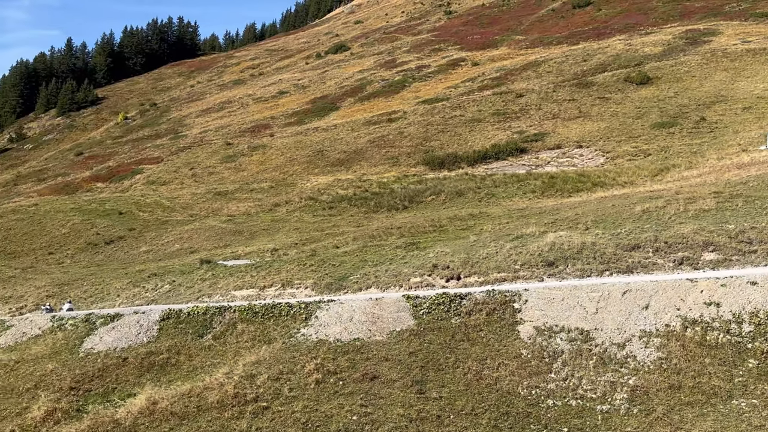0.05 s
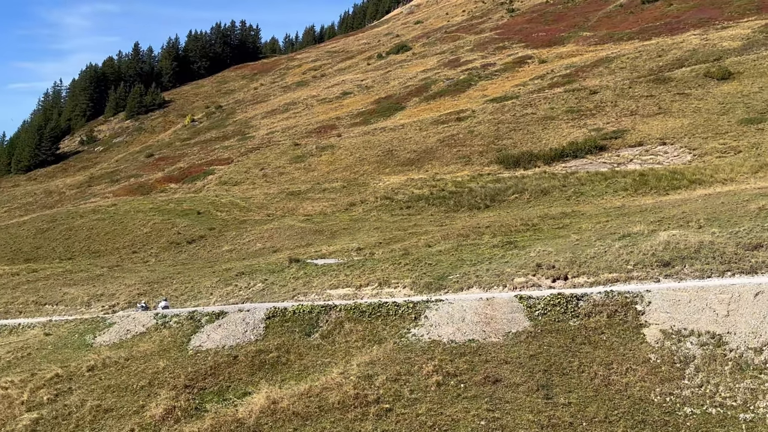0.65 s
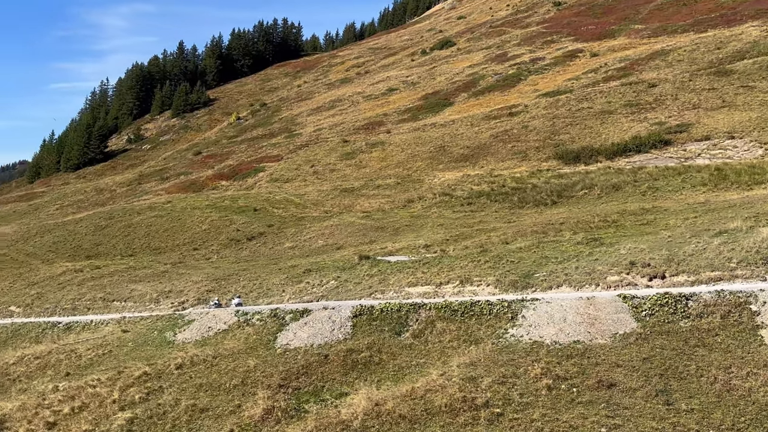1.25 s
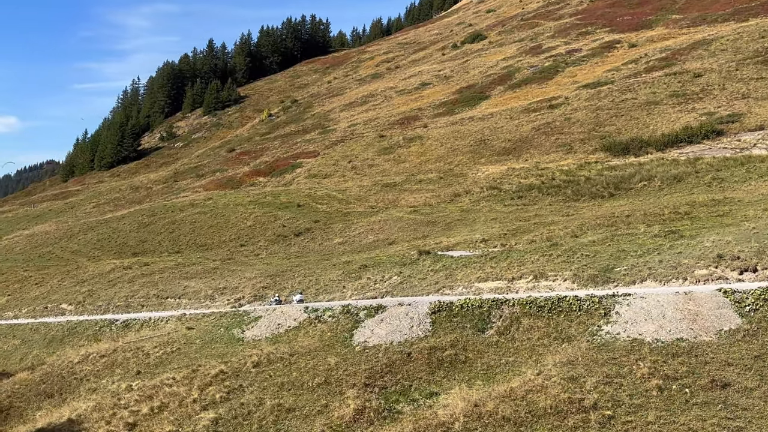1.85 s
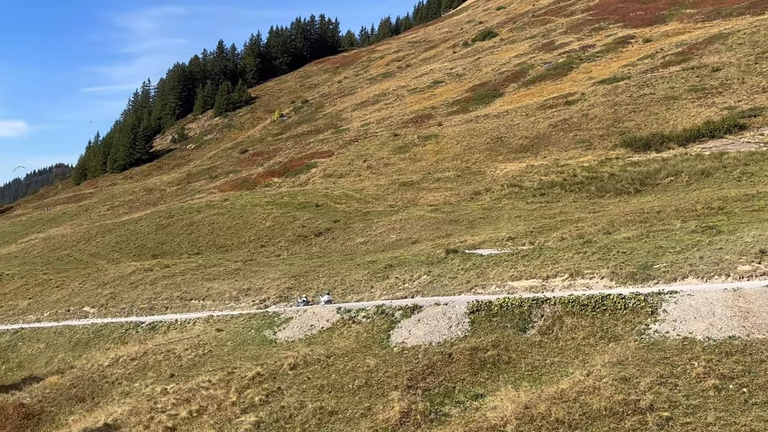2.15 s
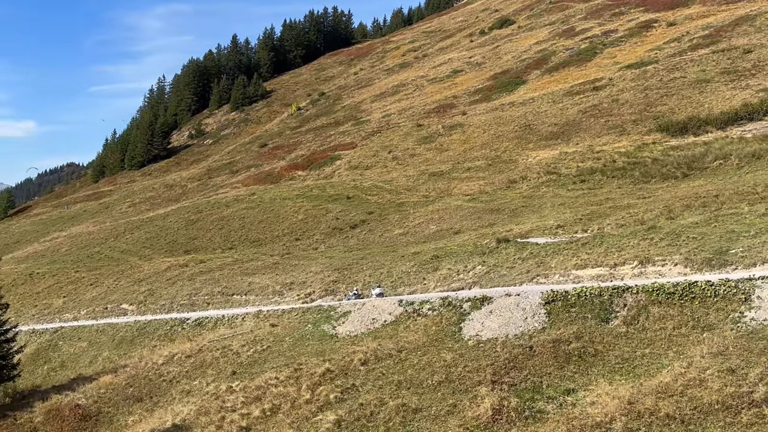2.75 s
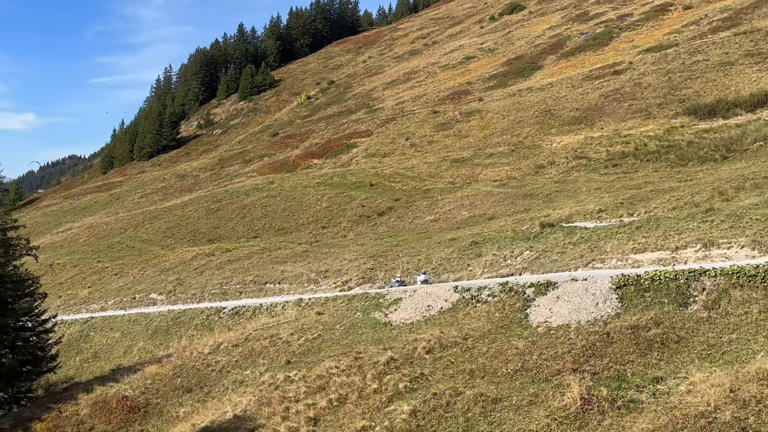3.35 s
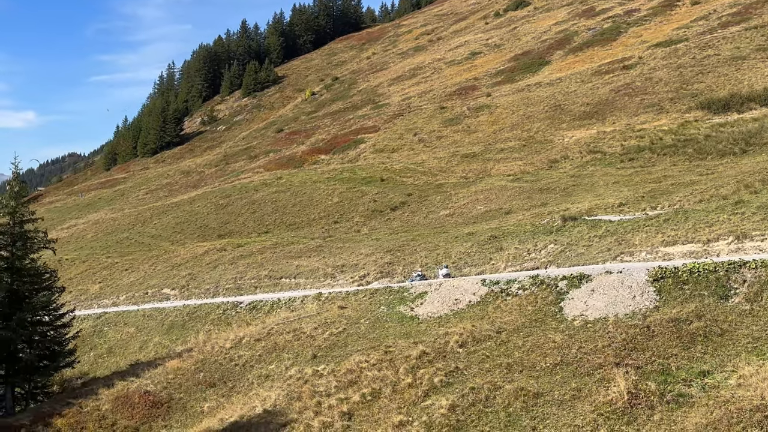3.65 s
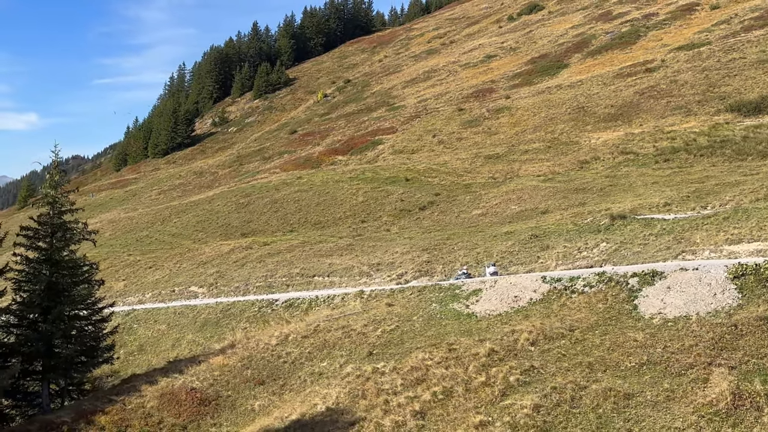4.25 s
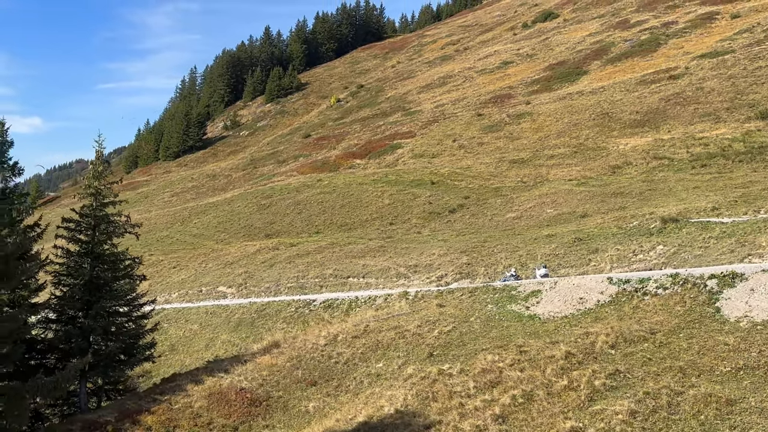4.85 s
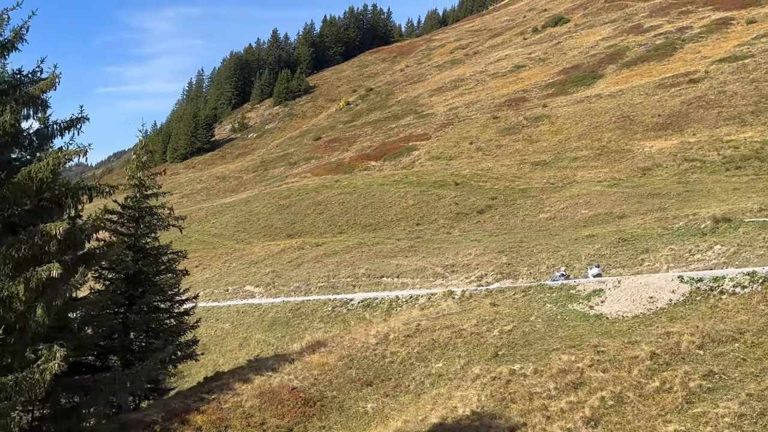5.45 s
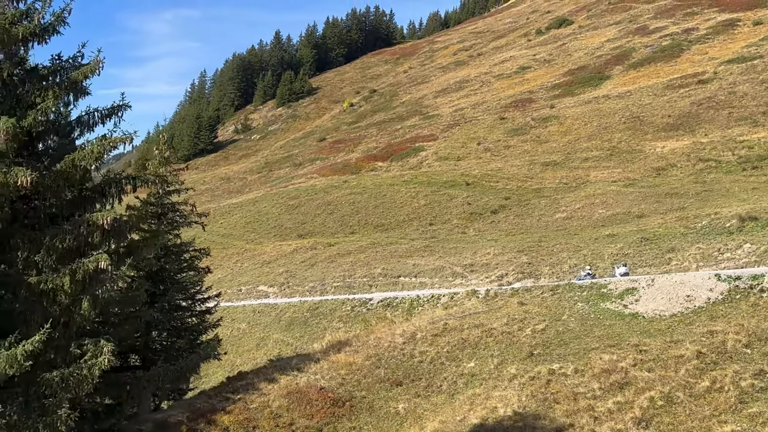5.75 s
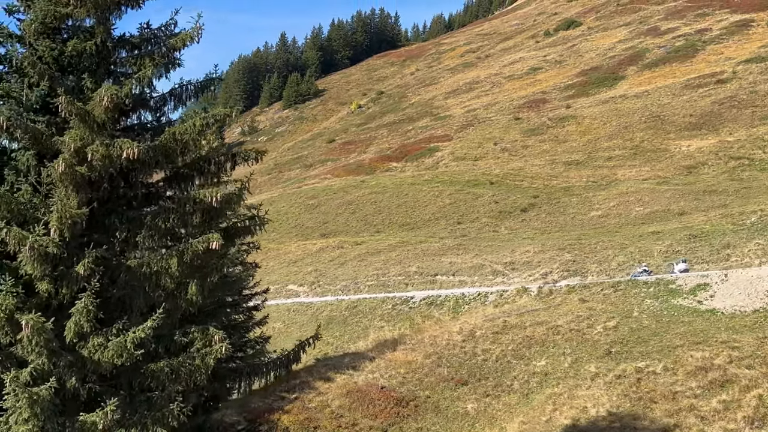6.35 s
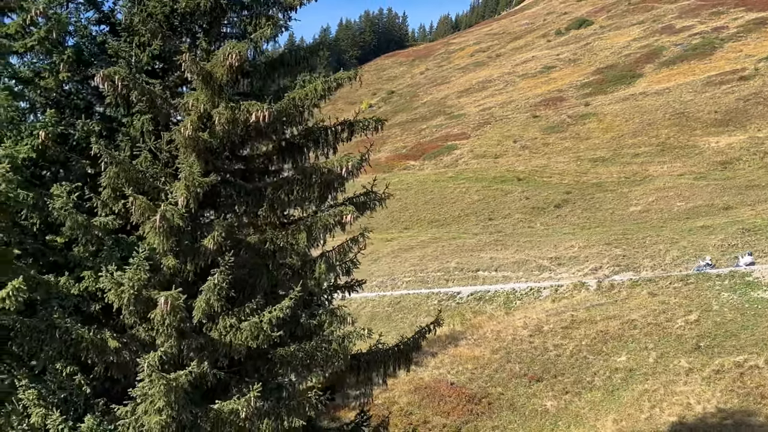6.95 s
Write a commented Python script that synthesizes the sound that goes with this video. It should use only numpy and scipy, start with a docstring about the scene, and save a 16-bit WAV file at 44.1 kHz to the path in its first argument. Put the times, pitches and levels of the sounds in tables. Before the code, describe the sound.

A gondola hums along its rope, booms and clatters quickly over tower rollers, then knocks and thuds as air rushes past, heard from inside.

```python
"""Inside a gondola passing a support tower. The haul rope hums through the hanger; the grip rolls over
a train of sheaves, each of which makes the cabin boom and its panels rattle. Then the swinging cabin
thuds and knocks, with small ticks from its fittings, while air rushes past the shell."""
import sys
import numpy as np
from scipy import signal
from scipy.fft import rfft, irfft, next_fast_len
from scipy.io import wavfile
from scipy.ndimage import uniform_filter1d, minimum_filter1d, map_coordinates

SR = 44100
rng = np.random.default_rng(int(sys.argv[2]) if len(sys.argv) > 2 else 0)


def to_wav(sig):
    """Store sig (one row per channel, or 1-D mono) as 16-bit WAV at the path in sys.argv[1].

    Samples outside -1..1 are clipped; the rate is SR.
    """
    pcm = np.clip(np.atleast_2d(sig), -1, 1) * 32767
    pcm = np.round(pcm).astype(np.int16)
    wavfile.write(sys.argv[1], SR, pcm.T)  # frames by channels


N = 317520
TIME_S = np.arange(N) / SR


# Rope hum, hanger overtone, low drone. Each row: time in seconds, relative level in dB.
HUM_LEVEL = [(0, -35), (.5, -51), (1.0, -33.5), (1.3, -34.5), (1.55, -26), (1.88, -24), (2.19, -28),
             (2.23, -44), (2.31, -49), (2.38, -28), (2.5, -27), (2.63, -32), (2.87, -28), (3.1, -39.5),
             (4.8, -31.5), (5.45, -41.5), (5.85, -32.5), (6.45, -37), (6.7, -46.5), (7.1, -35)]
OVERTONE_LEVEL = [(0, -64), (1.7, -53.5), (2.05, -52), (2.36, -58), (2.76, -51.5), (2.845, -32),
                  (2.875, -52), (3.6, -49.5), (3.9, -69.5)]
DRONE_LEVEL = [(0, -58.5), (1.9, -40), (2.15, -32.5), (2.55, -32), (4.0, -40), (4.75, -25), (5.3, -41.5),
               (7.2, -52)]

def rope_hum(hum_hz=182.2, overtone_hz=558, drone_hz=106.1):
    """The rope's twisted strands drum on the sheaves: a wavering hum with other tones around it."""
    pitch_hz = hum_hz * (1 + .008 * wobble(20))
    hum = amp(curve(HUM_LEVEL) - 2.15 + 1.6 * wobble(25)) * tone(pitch_hz)
    overtone = amp(curve(OVERTONE_LEVEL) + 2.3 * wobble(17)) * wavering(overtone_hz, .006, 23)
    fifth = amp(-48 + .56 * shake_db() + 4.5 * wobble(10)) * tone(pitch_hz * 3 / 2)
    drone = amp(curve(DRONE_LEVEL) + .5 + 2.2 * wobble(22)) * wavering(drone_hz, .0387, 20)
    return from_left(hum + overtone + fifth + drone, lead_ms=.45)


# Evenly spaced sheaves; the grip presses hardest mid-train.
SHEAVE_TIMES_S = 2.898 + (SHEAVE_GAP_S := .1233) * np.arange(7)
SHEAVE_PUSH_DB = -12 - 3.5 * np.linspace(-1, 1, len(SHEAVE_TIMES_S)) ** 2

def sheave_booms(sigma_s=.034, boom_hz=119, sway_hz=56):
    """Each sheave swells the cabin's two lowest resonances as the grip rides over it."""
    push = swells([(s, db, sigma_s) for s, db in zip(SHEAVE_TIMES_S, SHEAVE_PUSH_DB)])
    boom = amp(-1.63 + 2 * wobble(35)) * wavering(boom_hz, .0302, 30)
    sway = amp(-3.5 + 2.8 * wobble(30.1)) * wavering(sway_hz, .099, 25)
    walls = amp(-14.5) * noise(WALL_SPECTRUM)
    return grip_on() * push * (boom + sway + walls)


def grip_on(at_s=2.858, rise_s=.008):
    """Rises from 0 to 1 as the grip meets the first sheave."""
    return (1 + np.tanh((TIME_S - at_s) / rise_s)) / 2


# Cabin lurches. Each row: start in seconds, relative peak in dB, pitch in Hz, t60 in seconds.
THUDS = [(0.025, -21.5, 166, 0.18), (0.613, -23.5, 140, 0.05), (3.748, -12, 84.3, 0.17),
         (4.333, -13, 73.4, 0.18), (4.716, -5.5, 48.1, 0.39), (4.866, -10.5, 67.6, 1),
         (4.98, -3, 103, 0.071), (5.046, -4.5, 50.3, 0.12), (5.098, -13, 125.5, 0.072),
         (5.283, -13.5, 66.2, 0.12), (5.575, -12, 59.4, 0.19), (5.683, -16.5, 79.4, 0.062),
         (5.857, -16.5, 68.6, 0.078), (6.064, -19.5, 63, 0.054), (6.489, -19, 61, 0.34)]

def thuds(attack_s=.016):
    """A lurch on the hanger sets off a low, damped swing of the floor and one overtone."""
    out, t = np.zeros(N), np.arange(SR // 2) / SR
    for s, db, hz, t60_s in THUDS:
        phase = 2 * np.pi * hz * t
        swing = np.sin(phase) + .22 * np.sin(phase * rng.normal(1.9, .25))
        add(out, s, amp(db - 1.5) * crest(swing * burst(t, attack_s, t60_s)))
    return out


# Hanger knocks. Each row: start in seconds, body peak in dB, clack in dB re body,
# judder decay in seconds, clack pitch ratio.
KNOCKS = [(0.119, -24, -11.5, 0.023, 0.95), (.203, -37, 6.5, 0.0089, 0.88), (.25, -37.5, 3, 0.032, 0.87),
          (.306, -29.5, 3, 0.013, 0.79), (0.351, -26.5, -3, 0.016, 0.95), (.497, -33.5, -9.5, 0.0065, 0.86),
          (0.803, -43, -5, 0.0036, 1), (0.87, -34, -1, 0.014, 0.92), (.976, -28.5, -6, 0.0107, 0.87),
          (3.522, -20, -12.5, 0.021, 1.3), (3.757, -16, -18, 0.018, 1.04), (4.037, -24, -13, .007, 0.45),
          (4.333, -16.5, -11, 0.024, 0.67), (4.512, -22.5, -15.5, 0.014, 0.59),
          (4.766, -13, -14.5, 0.013, 1.15), (4.867, -17.5, -9.5, 0.0067, 1.02), (4.973, 0, -4.5, 0.012, 1),
          (5.1, -20.5, -14.5, 0.0058, 1.2), (5.279, -11, -4, 0.012, 1.023), (5.302, -20, 2, 0.007, 0.76),
          (5.576, -26, -0.5, 0.0058, 1.1), (5.595, -19.5, -5.5, 0.016, 0.87), (5.68, -15, -4, 0.017, 1.11),
          (6.049, -20, -2, 0.0067, 0.94), (6.29, -25, -10, 0.021, 1.1), (6.556, -22, -12, 0.0044, 1),
          (6.587, -19, -9.5, 0.009, 0.96), (6.621, -35.5, 12, 0.0026, 1.03)]
# Body and clack responses. Each row: frequency in Hz, gain in dB.
KNOCK_BODY = [(30, -25.5), (70, 2), (170, 4.5), (265, 5), (340, -3), (440, -6), (600, -24.5), (1000, -49),
              (2000, -72), (6000, -115)]
KNOCK_CLACK = [(150, -24.5), (245, 7), (335, -7.5), (450, 4.5), (540, -1.5), (660, -6.5), (750, 3.5),
               (795, -6.5), (845, -4.5), (890, -8.5), (945, -7), (1050, -12.5), (1170, -24), (1400, -28.5),
               (1850, -19.5), (2200, -32), (2700, -36.5), (5000, -67.5), (12000, -95)]

def knocks(body_lag_s=.00397):
    """The hanger judders in its joint: a round clack, then the dull body of the cabin."""
    bodies, clacks = np.zeros(N), np.zeros(N)
    for s, db, clack_db, decay_s, pitch_ratio in KNOCKS:
        clack = [(hz * pitch_ratio, gain_db) for hz, gain_db in KNOCK_CLACK]
        add(bodies, s + body_lag_s, amp(db) * crest(struck(judder(decay_s), KNOCK_BODY)))
        add(clacks, s, amp(db + clack_db) * crest(struck(judder(decay_s), clack)))
    return bodies + from_left(cabin(clacks, wet_db=-15.5), lead_ms=.21)


def judder(decay_s, gap_s=.003, count=16):
    """A quick, uneven run of contacts that dies away."""
    run = np.zeros(SR // 5)
    gaps_s = rng.uniform(.4, 1.6, count) * gap_s
    sizes = rng.uniform(.6, 1, count) * rng.choice([-1, 1], count)
    for s, size in zip(np.cumsum(gaps_s) - gaps_s[0], sizes):
        add(run, s, np.array([size * np.exp(-(s / decay_s) ** 2)]))
    return run


# Cabin shake. Each row: time in seconds, relative level in dB.
SHAKE_LEVEL = [(0, -32.5), (.25, -47), (1.25, -42.5), (1.7, -34.5), (2.1, -40), (2.52, -39.5),
               (2.85, -28.5), (3.5, -22.5), (3.9, -32.5), (4.6, -23.5), (5.1, -25), (5.38, -39.5),
               (5.95, -34), (6.8, -47), (7.2, -41.5)]
# Floor and wall noise. Each row: frequency in Hz, relative density in dB.
RUMBLE_SPECTRUM = [(12, -31.5), (25, 0), (36, 1.5), (55, 8), (85, 1), (115, -9), (160, -2.5), (300, -84.5),
                   (600, -120)]
WALL_SPECTRUM = [(50, -26), (90, 5), (120, 9), (155, 2), (205, 3.5), (235, -2.5), (280, -2.5), (370, -6),
                 (470, -12), (630, -16.5), (760, -40), (1200, -68), (3000, -120)]

def shell_rumble():
    """The running gear shakes the floor; the walls drone along and swell less."""
    floor = amp(curve(SHAKE_LEVEL) + 1.8) * noise(RUMBLE_SPECTRUM)
    walls = amp(-34 + .25 * shake_db() + 1.3 * wobble(23)) * noise(WALL_SPECTRUM)
    return floor + walls


def shake_db(usual_db=-36.5):
    """How much harder than usual the cabin is shaken."""
    return curve(SHAKE_LEVEL) - usual_db


# Panel clatters. Each row: start in seconds, peak in dB, t60 in seconds.
CLATTERS = [(2.858, -37.5, 0.089), (2.92, -38.5, 0.015), (2.977, -35.5, 0.079), (3.01, -34, 0.071),
            (3.034, -33.5, 0.017), (3.106, -34, 0.06), (3.143, -33.5, .03), (3.162, -35.5, 0.025),
            (3.233, -43, 0.044), (3.258, -34.5, 0.078), (3.326, -34, 0.055), (3.374, -30, 0.046),
            (3.396, -33.5, .04), (3.433, -35, 0.022), (3.484, -33, 0.046), (3.501, -33, .06),
            (3.58, -32, 0.035), (3.6147, -27, .055), (3.659, -40, 0.029), (3.684, -42.5, 0.029)]
# Clatter response. Each row: frequency in Hz, gain in dB.
CLATTER_RESPONSE = [(500, -2), (850, -4.5), (1200, 8.5), (1600, 2.5), (2000, 6.5), (2750, -5), (3300, -1),
                    (4000, -10.5), (4800, -7.5), (5500, -18), (6300, -9), (7500, -28.5), (9800, -30.5),
                    (15000, -32.5)]

def panel_clatters(attack_s=.0015):
    """Jolts from the sheaves throw the panels against their frames in rough bursts of contacts."""
    out, t = np.zeros(N), np.arange(SR // 8) / SR
    for s, db, t60_s in CLATTERS:
        hits = contacts(len(t), rate_hz=3500, spread_db=5.5) * burst(t, attack_s, t60_s)
        add(out, s, amp(db) * crest(struck(hits, CLATTER_RESPONSE)))
    return cabin(out, wet_db=-11.5) * pan(left_db=1.5)


# Panel response. Each row: frequency in Hz, gain in dB.
PANEL_RESPONSE = [(400, -13), (800, -1), (1150, 9.5), (1550, 7), (2050, 2.5), (2700, -7), (3300, -8.5),
                  (4100, -11), (4800, -13.5), (5400, -25), (6300, -16.5), (7500, -25), (9800, -22),
                  (11500, -35), (15800, -30)]
# Panel scrapes. Each row: centre in seconds, relative level in dB, sigma in seconds.
SCRAPES = [(.3, -58, 0.07), (.53, -62, 0.019), (4.98, -47, 0.016)]
RATTLE_TIMES_S, RATTLE_SIGMA_S = SHEAVE_TIMES_S - .041, .053  # just ahead of each boom

def panel_rattle(rate_hz=550, spread_db=5):
    """Loose panels chatter all around in tiny contacts, scrape, and surge at every sheave."""
    flutter = amp(1.8 * wobble(70))
    surges = [(s, db - 41, RATTLE_SIGMA_S) for s, db in zip(RATTLE_TIMES_S, SHEAVE_PUSH_DB)]
    idle = amp(-66 + .35 * shake_db())
    drive = idle + grip_on() * swells(surges) + swells(SCRAPES)
    left, ahead, right = [unit(struck(contacts(N, rate_hz, spread_db), PANEL_RESPONSE))
                          for _ in range(3)]
    return cabin(drive * flutter * (ahead + .5 * np.array([left, right])), wet_db=-4.5)


# Panel clicks. Each row: start in seconds, relative peak in dB.
CLICKS = [(0.143, -40), (0.528, -38.5), (.56, -37), (.592, -40), (.706, -45.5), (.885, -44.5), (.911, -45),
          (.946, -48), (0.992, -47), (1.052, -46.5), (1.082, -43), (1.164, -42), (1.177, -46.5),
          (1.198, -46.5), (1.356, -43.5), (1.385, -46.5), (1.454, -42.5), (1.575, -35.5), (1.607, -38),
          (1.657, -36.5), (1.7247, -39), (1.779, -39), (1.802, -38.5), (1.828, -40.5), (1.918, -37),
          (2.003, -39), (2.021, -37), (2.124, -41), (2.233, -46), (2.47, -37.5), (2.502, -41.5),
          (2.53, -42.5), (2.5623, -34.5), (2.669, -37), (2.684, -39), (2.746, -36), (5.507, -41),
          (5.672, -41), (5.842, -43), (5.904, -41), (6.018, -41), (6.157, -45.5), (6.221, -60),
          (6.345, -51), (6.403, -44), (6.518, -43), (6.55, -42), (6.852, -42), (7.07, -48)]

def panel_clicks(t60_s=.015):
    """A panel slips under load with a dry, woody click, each a little different in colour."""
    out, t = np.zeros(N), np.arange(SR // 20) / SR
    for s, db in CLICKS:
        response = [(hz, gain_db + rng.standard_normal()) for hz, gain_db in PANEL_RESPONSE]
        add(out, s, amp(db - 1) * crest(struck(snap(t, t60_s), response)))
    return cabin(dulled(out), wet_db=-10) * pan(left_db=1.5)


# Hanger groans. Each row: centre in seconds, level in dB, sigma in seconds, pitch in Hz.
GROANS = [(2.944, -29, 0.0016, 590), (3.005, -38, 0.014, 557), (3.045, -32, 0.0025, 478),
          (3.054, -36.5, 0.0076, 618), (3.188, -38, 0.0032, 425), (3.326, -43.5, 0.0045, 532),
          (3.375, -39, 0.0072, 640), (3.55, -33.5, .016, 420)]
# Hanger rub. Each row: frequency in Hz, relative density in dB.
RUB_SPECTRUM = [(200, -85.5), (400, -25.5), (520, 6.5), (565, -6), (650, 7.5), (800, -21.5), (1500, -120)]

def hanger_groans(rub_db=-49, rub_sigma_s=.065):
    """The hanger rubs softly at each sheave and gives short, pitched groans when jolted."""
    rubs = swells([(s, rub_db, rub_sigma_s) for s in SHEAVE_TIMES_S]) * noise(RUB_SPECTRUM)
    waver = 1 + .0515 * wobble(120)
    return rubs + sum(swells([(s, db, sigma_s)]) * tone(hz * waver) for s, db, sigma_s, hz in GROANS)


# Sheave hiss. Each row: frequency in Hz, relative density in dB.
HISS_SPECTRUM = [(1000, -1), (1300, 4), (2200, -3.5), (2800, 0), (3500, 1.5), (4100, -5.5), (4800, -4),
                 (5400, -7), (6200, -7), (7400, -16), (9700, -17), (11500, -24.5), (15500, -27.5)]
# Brief flares. Each row: centre in seconds, level in dB, sigma in seconds.
HISS_FLARES = [(3.398, -51.5, 0.01), (3.515, -48, 0.0069), (7.2, -64, 0.062)]

def sheave_hiss(rise_db_per_s=8.5, fall_db_per_s=151, dip=.28):
    """The sheave train hisses on the left: grows as it nears, pulses, and drops away once passed."""
    past_last_s = TIME_S - RATTLE_TIMES_S[-1]
    nearness_db = np.minimum(rise_db_per_s * past_last_s, -fall_db_per_s * past_last_s)
    between = swells([(s - SHEAVE_GAP_S / 2, 0, RATTLE_SIGMA_S / 2) for s in RATTLE_TIMES_S])
    passing = amp(-55 + nearness_db + 2 * grip_on()) * (1 - dip * between)
    running_rope = amp(-81.5 + .3 * shake_db())
    level = np.hypot(passing, running_rope) + swells(HISS_FLARES)
    flutter = amp(1.7 * wobble(50))
    return level * flutter * noise(HISS_SPECTRUM) * pan(left_db=5)


# Catch hits. Each row: start in seconds, clack peak in dB.
CATCH_HITS = [(0.256, -43.5), (0.307, -43), (0.3226, -41), (0.332, -35.5), (0.342, -44.5), (0.3822, -45)]
# Catch response. Each row: frequency in Hz, gain in dB.
CATCH_RESPONSE = [(1200, -5.5), (1950, 10), (2600, -6), (3200, 2.5), (3800, -16), (4650, -16), (5400, -18),
                  (6300, -14.5), (8000, -27), (15000, -35)]

def catch_jiggle(t60_s=.0068, ring_hz=3200, ring_t60_s=.017):
    """A small metal catch jiggles: each hit is a rough clack with a short ring of close modes."""
    out, t = np.zeros(N), np.arange(SR // 10) / SR
    for s, db in CATCH_HITS:
        clack = crest(struck(snap(t, t60_s), CATCH_RESPONSE))
        ring = amp(-15 - 60 * t / ring_t60_s) * modes(t, ring_hz * rng.normal(1, .04, size=3))
        add(out, s, amp(db) * (clack + ring))
    return cabin(out, wet_db=-1.5)


# Fitting ticks. Each row: start in seconds, relative peak in dB.
TICKS = [(2.669, -53), (3.011, -48), (3.375, -42.5), (4.669, -51), (4.682, -47), (4.96, -51.5),
         (5.216, -57), (5.27, -49), (5.907, -53), (6.018, -53), (6.148, -47.5), (6.154, -47), (6.25, -50),
         (6.284, -53), (6.401, -54.5), (6.52, -57)]

def fitting_ticks(centre_hz=9030, width=.11, attack_s=.002, t60_s=.016, ring_t60_s=.07):
    """Small fittings give squeaky ticks in a narrow, high band, each with a short ring."""
    out, t = np.zeros(N), np.arange(SR // 10) / SR
    band = [(centre_hz * (1 + k * width), db) for k, db in [(-2, -30), (-1, 0), (1, -3), (3, -30)]]
    for s, db in TICKS:
        modes_hz = centre_hz * (1 + width * rng.uniform(-.95, 1, size=3))
        ring = amp(-10) * burst(t, attack_s, ring_t60_s) * crest(modes(t, modes_hz))
        rub = rng.standard_normal(len(t)) * burst(t, attack_s, t60_s)
        add(out, s, amp(db - 7.5) * (crest(struck(rub, band)) + ring))
    return cabin(out, wet_db=-5) * pan(left_db=-17.5)


# Air rush. Each row: time in seconds, relative level in dB.
RUSH_LEVEL = [(0, -53), (.3, -45.5), (.8, -52.5), (1.2, -49), (2.4, -55.5), (3.05, -50), (3.68, -47.5),
              (3.85, -53), (4.04, -56), (4.07, -47.5), (4.27, -50), (4.4, -44), (5, -41.5), (7.2, -43)]
# Rush and faint hiss. Each row: frequency in Hz, relative density in dB.
RUSH_SPECTRUM = [(200, -14.5), (400, 7), (700, 5), (950, 0), (1250, -10), (1850, -19), (2700, -31),
                 (5000, -43), (9000, -50.5)]
FAINT_HISS_SPECTRUM = [(3000, -9.5), (6000, -1), (8500, 7), (10000, 8), (11500, -0.5), (13000, 2),
                       (15500, 2.5)]

def air_rush():
    """Air flutters along the shell, over a faint, even hiss."""
    rush = amp(curve(RUSH_LEVEL) - 2 + 1.7 * wobble(110)) * noise(RUSH_SPECTRUM)
    return rush + amp(-81 + wobble(3)) * noise(FAINT_HISS_SPECTRUM)


def frame_creaks(rate_hz=55, scatter_db=5, t60_s=.015):
    """The frame crackles in many small slips with the push of the air and the shaking."""
    slips, t = np.zeros(N), np.arange(SR // 20) / SR
    for k, (jitter, size) in enumerate(rng.uniform(-1, 1, (int(rate_hz * N / SR), 2))):
        add(slips, (k + jitter) / rate_hz, amp(scatter_db * size) * snap(t, t60_s))
    woody = unit(dulled(struck(slips, PANEL_RESPONSE)))
    level_db = curve(RUSH_LEVEL) - 16 + .23 * shake_db()
    return from_left(cabin(amp(level_db) * woody, wet_db=-9), lead_ms=-.11)


# Rope ringing. Each row: centre in Hz, sigma in Hz, gain in dB.
WHISTLE_BANDS = [(3640, 280, 2), (6040, 76, -6.5)]
# Rope whine. Each row: time in seconds, pitch in Hz, level in dB.
WHINE = [(1.7, 1180, -85), (2.05, 1213, -64.5), (2.4, 1221, -71), (2.65, 1270, -71), (2.82, 1310, -61),
         (2.95, 1340, -87)]

def rope_whistle(loudest_s=2.5, fade_db_per_s=1.8):
    """The running rope rings faintly in two high bands; a thin whine climbs as the tower nears."""
    def bands(hz):
        return sum(amp(db) * bell(hz, centre_hz, sigma_hz) for centre_hz, sigma_hz, db in WHISTLE_BANDS)
    whine = amp(curve(WHINE, column=2) + 2 * wobble(9)) * wavering(curve(WHINE), .011, 40)
    ring_db = -72.5 - fade_db_per_s * np.abs(TIME_S - loudest_s)
    ring = amp(ring_db) * unit(filtered(rng.standard_normal((2, N)), bands))
    return ring + from_left(whine, lead_ms=.15)


# Rustle level. Each row: time in seconds, level in dB.
RUSTLE_LEVEL = [(0, -69.5), (.7, -72.5), (3.5, -73.5), (4.1, -81)]
# Rustle colour. Each row: frequency in Hz, relative density in dB.
RUSTLE_SPECTRUM = [(5000, -26.5), (8500, -13), (10500, -7), (13000, -0.5), (15000, 0)]
# Brief rubs. Each row: centre in seconds, level in dB, sigma in seconds.
RUSTLE_RUBS = [(.28, -69, 0.027), (1.094, -57.5, 0.0046), (1.124, -56.5, 0.0049), (3.376, -62, 0.0051),
               (3.935, -66, 0.0056)]

def rustle(rate_hz=450):
    """Faint, crisp grains of something rubbing close by, dying down after the tower."""
    grains = (rng.random((2, N)) < rate_hz / SR) * rng.standard_normal((2, N))
    level = amp(curve(RUSTLE_LEVEL) + 2.5 * wobble(35)) + swells(RUSTLE_RUBS)
    return level * unit(filtered(grains, lambda hz: amp(along(RUSTLE_SPECTRUM, hz))))


# Cabin decay. Each row: frequency in Hz, t60 in seconds.
CABIN_T60 = [(200, 0.089), (2000, 0.13), (10000, 0.0069)]

def cabin(x, wet_db):
    """Direct sound plus the short answer of the glass walls."""
    hz, t, bins = signal.stft(rng.standard_normal((2, SR // 4)), SR, nperseg=256)
    tail = signal.istft(bins * amp(-60 * t / along(CABIN_T60, hz)[:, None]), SR, nperseg=256)[1]
    wet = signal.fftconvolve(np.atleast_2d(x), tail / np.linalg.norm(tail[0]), axes=1)[:, :N]
    return x + amp(wet_db) * wet


# Stereo width. Each row: frequency in Hz, side re mid in dB.
WIDTH = [(40, -1.5), (200, -1), (450, -5), (750, 3.5), (1500, 2), (3000, 0), (8000, 3), (13000, -12)]

def noise(spectrum):
    """Diffuse stereo noise whose mid has rms 1."""
    def gains(hz):
        mid_db = along(spectrum, hz)
        return amp([mid_db, mid_db + along(WIDTH, hz)])
    mid, side = filtered(rng.standard_normal((2, N)), gains)
    return np.array([mid + side, mid - side]) / np.std(mid)


def contacts(size, rate_hz, spread_db):
    """Tiny impacts at random moments, a few much stronger than the rest."""
    hits = (rng.random(size) < rate_hz / SR) * rng.choice([-1, 1], size)
    return hits * amp(spread_db * np.minimum(rng.exponential(size=size), 2))


def struck(x, spectrum, size=4096):
    """x through a minimum-phase body with the given spectrum."""
    cepstrum = irfft(np.log(amp(along(spectrum, np.fft.rfftfreq(size, 1 / SR)))))
    cepstrum[1:size // 2] *= 2
    cepstrum[size // 2 + 1:] = 0
    return signal.fftconvolve(x, irfft(np.exp(rfft(cepstrum))))[:len(x)]


def snap(t, t60_s):
    """Decaying white noise."""
    return rng.standard_normal(len(t)) * amp(-60 * t / t60_s)


def burst(t, attack_s, t60_s):
    """Attack and decay envelope."""
    return amp(-60 * t / t60_s) * (1 - np.exp(-t / attack_s))


def modes(t, hz):
    """Sum of equal sines."""
    return np.sin(2 * np.pi * np.outer(hz, t)).sum(axis=0)


def tone(hz):
    """Sine of rms 1 following a pitch curve."""
    return np.sqrt(2) * np.sin(2 * np.pi * (np.cumsum(hz) / SR + rng.random()))


def wavering(hz, depth, rate_hz):
    """Tone whose pitch wanders by about the fraction depth."""
    return tone(hz * (1 + depth * wobble(rate_hz)))


def wobble(rate_hz):
    """Smooth random curve, rate_hz knots a second."""
    return map_coordinates(rng.standard_normal(int(N * rate_hz / SR) + 4), [TIME_S * rate_hz])


def bell(x, centre, sigma):
    """Gaussian of peak 1."""
    return np.exp(-((x - centre) / sigma) ** 2 / 2)


def swells(rows):
    """Gain of bell-shaped swells, summed in power."""
    return np.sqrt(sum((amp(db) * bell(TIME_S, s, sigma_s)) ** 2 for s, db, sigma_s in rows))


def curve(rows, column=1):
    """One column of a time table, per sample."""
    columns = np.transpose(rows)
    return np.interp(TIME_S, columns[0], columns[column])


def along(points, hz):
    """(Hz, value) points read on a log axis."""
    knots_hz, values = np.transpose(points)
    return np.interp(np.log(hz + 1), np.log(knots_hz), values)


def filtered(x, response):
    """x through a frequency response."""
    size = next_fast_len(N + SR // 2)
    return irfft(rfft(x, size) * response(np.fft.rfftfreq(size, 1 / SR)), size)[..., :N]


def dulled(x, corner_hz=5000):
    """One-pole low-pass."""
    return filtered(x, lambda hz: 1 / (1 + 1j * hz / corner_hz))


def from_left(x, lead_ms):
    """Sound from the left reaches the left channel first; negative lead: from the right."""
    return filtered(x, lambda hz: np.exp(np.outer([1j, -1j], np.pi * hz * lead_ms / 1000)))


def pan(left_db):
    """Channel gains for a left-right difference."""
    return amp([[left_db / 2], [-left_db / 2]])


def add(track, s, sound):
    """Mix a sound into a track at s seconds."""
    part = track[..., max(round(s * SR), 0):][..., :sound.shape[-1]]
    part += sound[..., :part.shape[-1]]


def amp(db):
    """Decibels to gain."""
    return 10 ** (np.asarray(db) / 20)


def unit(x):
    """Scale to rms 1."""
    return x / np.sqrt(np.mean(x ** 2) + 1e-20)


def crest(x):
    """Scale to peak 1."""
    return x / np.abs(x).max()


def limit(x, ceiling=.88, hold_samples=600):
    """The level dips briefly around any peak above the ceiling."""
    gain = np.minimum(1, ceiling / (np.abs(x).max(axis=0) + 1e-9))
    return x * uniform_filter1d(minimum_filter1d(gain, hold_samples), hold_samples // 2)


def scene():
    """Everything heard from a seat in the cabin."""
    running_gear = rope_hum() + rope_whistle() + sheave_hiss()
    structure = shell_rumble() + sheave_booms() + hanger_groans()
    jolts = thuds() + knocks()
    panels = panel_rattle() + panel_clicks() + panel_clatters()
    fittings = frame_creaks() + catch_jiggle() + fitting_ticks() + rustle()
    return running_gear + structure + jolts + panels + fittings + air_rush()


# Mono edge. Each row: time in seconds, frequency in Hz below which the sound is mono.
MONO_EDGE = [(.6, 6.8), (1.0, 250), (1.5, 570), (4.1, 375), (4.6, 970), (7.2, 1310)]

def record(dry, low_cut_hz=25, top_hz=15830):
    """Lows fold to mono under a moving edge; then low cut, peak limiter and band limit."""
    mid, side = (dry[0] + dry[1]) / 2, (dry[0] - dry[1]) / 2
    hz, t, bins = signal.stft(side, SR, nperseg=2048)
    edge_hz = np.interp(t, *np.transpose(MONO_EDGE))
    slope = (hz[:, None] / edge_hz) ** 12
    side = signal.istft(bins * slope / (1 + slope), SR, nperseg=2048)[1][:N]
    stereo = np.array([mid + side, mid - side])
    stereo = filtered(stereo, lambda hz: hz ** 6 / (hz ** 6 + low_cut_hz ** 6))
    return filtered(limit(stereo), lambda hz: hz < top_hz)


dry = scene()
out = record(dry)
to_wav(out)
```